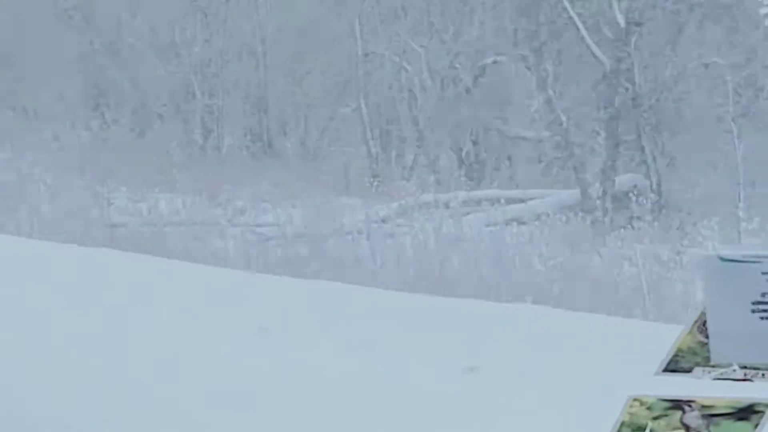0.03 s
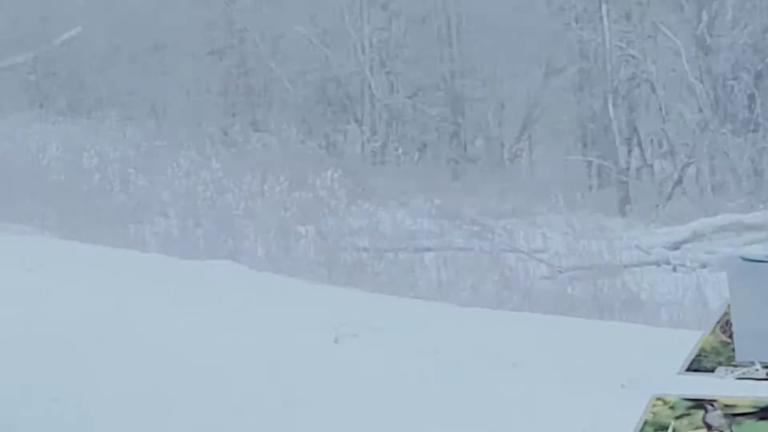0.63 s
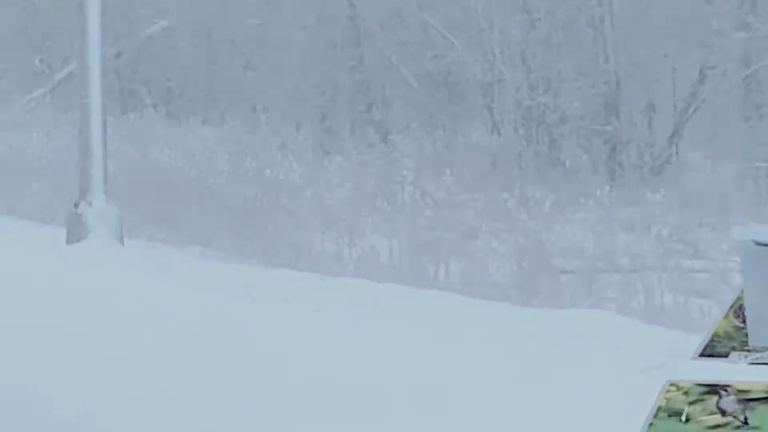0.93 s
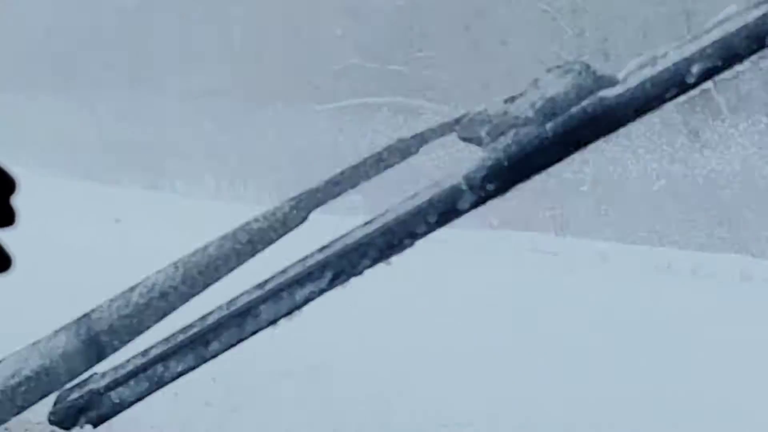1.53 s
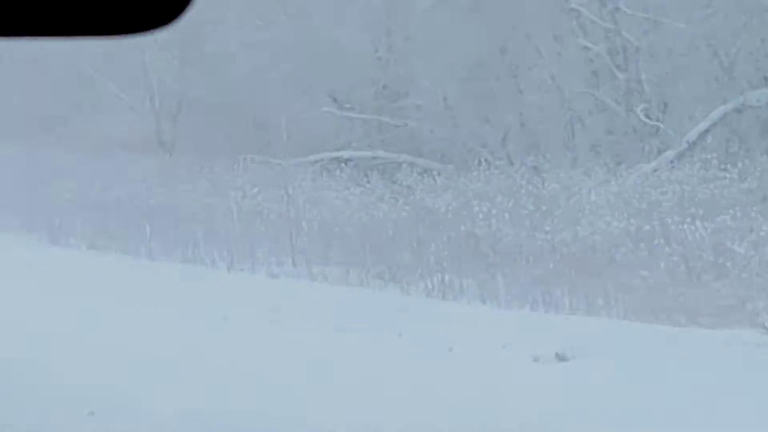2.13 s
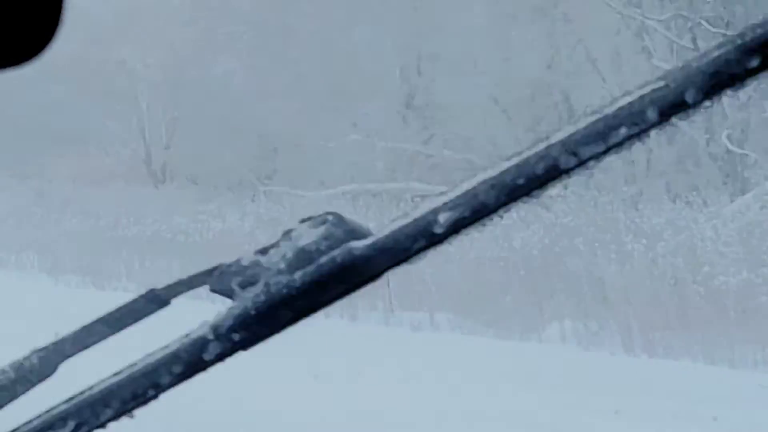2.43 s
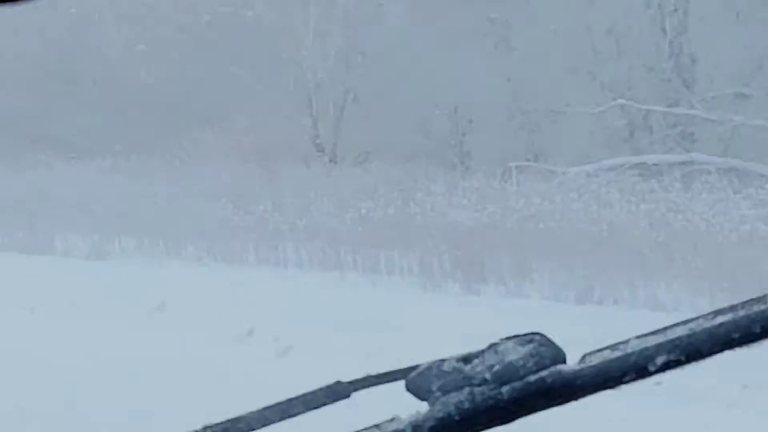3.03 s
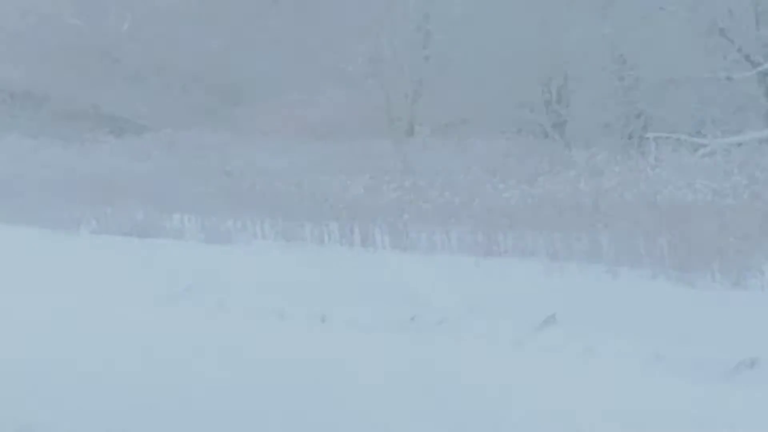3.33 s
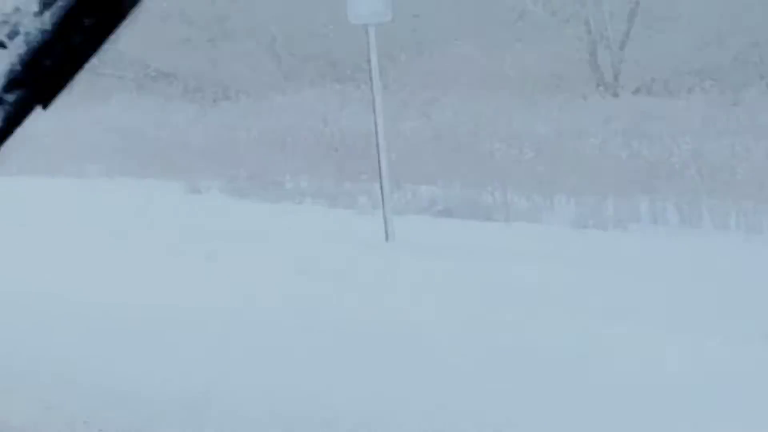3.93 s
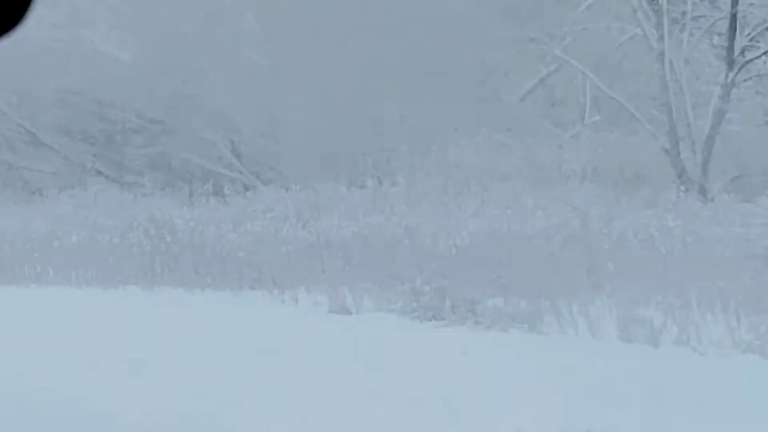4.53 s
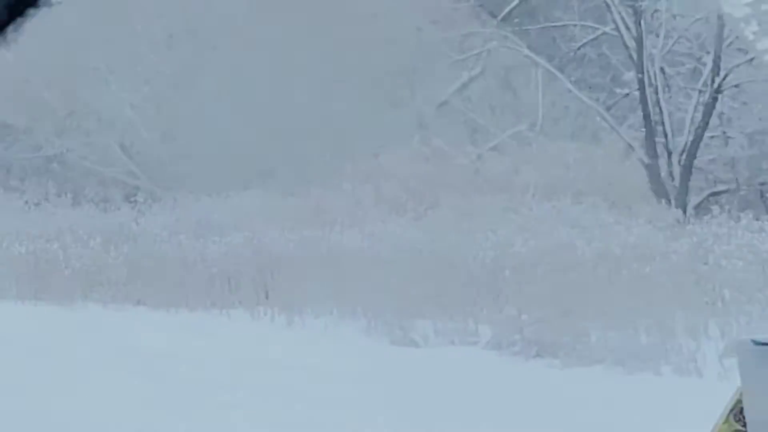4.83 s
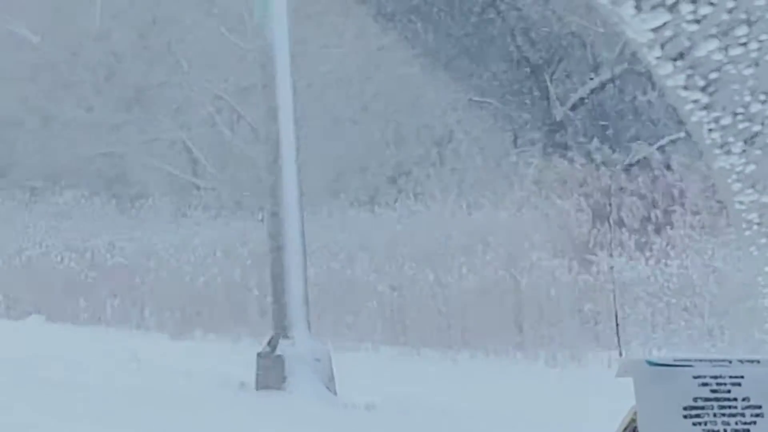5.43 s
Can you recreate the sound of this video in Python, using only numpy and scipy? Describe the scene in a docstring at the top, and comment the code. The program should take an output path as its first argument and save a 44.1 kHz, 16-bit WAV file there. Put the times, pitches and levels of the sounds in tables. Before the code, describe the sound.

Windshield wipers thump and flip at regular intervals above the low drone and bumps of a car driving through snow, heard inside.

```python
"""A car drives steadily on a snowy road, heard from inside: the tyres shake the body into a rumble,
a drone and a roar, and ruts make it boom. Slush hisses under the wheels and the wiper blades.
The wipers turn about every 0.8 s: at the near end the arm knocks and the rubber blade slaps over,
at the far end it flips softly with a clunk that once booms. The rubber scuffs, chatters, sweeps off
snow and squeals faintly once. Small ticks and light rustles come and go."""
import sys
import numpy as np
from scipy import signal
from scipy.fft import rfft, irfft
from scipy.io import wavfile
from scipy.ndimage import uniform_filter1d

SR = 44100
rng = np.random.default_rng(int(sys.argv[2]) if len(sys.argv) > 2 else 0)


def pcm_store(signal):
    """Save signal as 16-bit PCM."""
    levels = np.round(np.clip(np.atleast_2d(signal), -1, 1) * 32767)
    wavfile.write(sys.argv[1], SR, levels.astype(np.int16).T)


N = 242550
TIME = np.arange(N) / SR
FREQS = np.maximum(np.arange(N // 2 + 1) * SR / N, 1)

# A tone colour says how strong each pitch is. Levels in all tables are relative.
# Bright tone colour of spraying slush, also used for the ticks: pitch_hz, level_db
SPRAY_COLOUR = [(1500, 10), (3500, 8), (5500, 3), (7000, 2), (8000, -3), (9500, -1.5), (11000, -1),
                (15500, -4)]


def from_db(db):
    """Turn decibels into a number to multiply by."""
    return 10 ** (np.asarray(db) / 20)


def unit_power(x):
    """Scale a sound to an average power of 1."""
    return x / np.sqrt(np.mean(x ** 2) + 1e-20)


def curve_over_pitch(points):
    """Join (pitch, value) points with straight lines on a scale of octaves."""
    hz, value = np.transpose(points)
    return np.interp(np.log(FREQS), np.log(hz), value)


def bump(centre_s, half_s):
    """A smooth rise and fall of height 1."""
    return np.exp(-((TIME - centre_s) / half_s) ** 2)


def in_cabin(pair, colour):
    """Give two unrelated signals a tone colour; both ears share the bass, the treble is all around."""
    # How alike left and right are in the cabin: pitch_hz, likeness (1 = the same, 0 = unrelated)
    likeness = [(30, 0.93), (75, 0.95), (170, 0.95), (340, 0.82), (520, 0.53), (800, 0.35), (1050, -0.24),
                (1550, -0.16), (2200, -0.32), (2700, -0.012), (3500, -0.14), (5000, -0.026), (15000, -0.12)]
    alike = np.clip(curve_over_pitch(likeness), -.99, .99)
    mid, side = rfft(pair) * from_db(curve_over_pitch(colour))
    left_right = np.sqrt(1 + alike) * mid + np.sqrt(1 - alike) * side * [[1], [-1]]
    return unit_power(irfft(left_right, N))


def noise(colour):
    """Stereo noise in the cabin with the given tone colour."""
    return in_cabin(rng.standard_normal((2, N)), colour)


def steady(x, span_s):
    """Even out the slow swells of a noise."""
    power = uniform_filter1d(np.mean(x ** 2, axis=0), max(int(span_s * SR), 100))
    return x / np.sqrt(power + 1e-9)


def grains(per_s, spread_db):
    """Tiny impacts of uneven size at random times."""
    sizes = from_db(spread_db * np.minimum(rng.exponential(1, (2, N)), 5))
    hits = rng.random((2, N)) < per_s / SR
    return unit_power(hits * sizes * rng.standard_normal((2, N)))


def contacts(rows, colour, tail_db, tail_s, grit_db):
    """Each touch of two parts is a quick rush of tiny impacts that dies away into a faint tail."""
    rush = in_cabin(grains(per_s=7000, spread_db=grit_db), colour)
    treble = signal.sosfiltfilt(signal.butter(1, 4500, "high", fs=SR, output="sos"), rush)
    out = np.zeros((2, N))
    for peak_s, level_db, rise_s, decay_s, treble_db in rows:
        span = slice(int((peak_s - .05) * SR), int((peak_s + .3) * SR))
        before, after = np.minimum(TIME[span] - peak_s, 0), np.maximum(TIME[span] - peak_s, 0)
        fall = np.hypot(np.exp(-after / decay_s), from_db(tail_db) * np.exp(-after / tail_s))
        loudness = from_db(level_db) * np.exp(-(before / rise_s) ** 2) * fall
        out[:, span] += loudness * (rush[:, span] + (from_db(treble_db) - 1) * treble[:, span])
    return out


def road():
    """Tyres shake the body into a deep rumble, a drone and a dull roar that follow the road surface."""
    # Tone colours of the three sounds: pitch_hz, level_db
    rumble_colour = [(12, -27), (26, -23), (38, 9.5), (48, -11), (61, 6.5), (74, 5.5), (90, 2), (115, -6.5),
                     (140, -12.5), (220, -69.5)]
    drone_colour = [(70, -3), (115, -0.5), (150, -1), (185, 0.5), (215, 0.5), (242, -5.5), (275, -3.5),
                    (305, -4), (360, -17), (450, -20), (700, -73)]
    roar_colour = [(200, -8.5), (340, 6), (400, 4), (480, 3), (600, 1.5), (780, 1), (970, -8), (1300, -6),
                   (1480, -7.5), (1680, -8), (2050, -13), (3000, -22.5), (6000, -56)]
    # Ruts shake the body harder, soft snow calms it: centre_s, half_length_s, rumble_db, drone_db
    patches = [(1.276, 0.11, 1.5, 4), (1.85, 0.28, -2, -.5), (2.073, .06, 6, 0.5), (3.148, 0.25, 2.5, 1),
               (3.493, 0.049, -3.5, -1), (3.863, 0.14, 9.5, 2), (4.2, 0.085, -2.5, 0.5), (4.53, 0.16, 3, 1),
               (4.873, 0.13, 5, 1.5), (5.35, 0.082, 1.5, 2.5)]
    rough_from_s, fade_s, roar_rise_db_per_s = 0.98, 0.75, 0.53
    smooth = np.clip(.5 - (TIME - rough_from_s) / fade_s, 0, 1)  # 1 on smooth road, 0 on rough
    rumble_swing_db = sum(db * bump(centre_s, half_s) for centre_s, half_s, db, _ in patches)
    drone_swing_db = sum(db * bump(centre_s, half_s) for centre_s, half_s, _, db in patches)
    roar_swing_db = 0.23 * drone_swing_db + roar_rise_db_per_s * (TIME - TIME.mean())
    rumble = from_db(-19.5 - 5 * smooth + rumble_swing_db) * steady(noise(rumble_colour), span_s=0.128)
    drone = from_db(-24 - 3.5 * smooth + drone_swing_db) * steady(noise(drone_colour), span_s=0.068)
    roar = from_db(-32.5 - smooth + roar_swing_db) * noise(roar_colour)
    return rumble + drone + roar


def slush():
    """Wet snow hisses steadily under the tyres, and under the blades more loudly as they move faster."""
    # Tone colour of the swish: pitch_hz, level_db
    swish_colour = [(1200, -6), (2200, -12.5), (2750, 2.5), (3500, -1.5), (4400, -6.5), (5400, -11),
                    (7000, -14), (8200, -22), (15000, -44)]
    # Wiper sweeps through wet snow: start_s, swish_db, spray_db, change_db (of both, start to end)
    sweeps = [(-.25, -71, -64, -10), (0.531, -66, -53.5, -2), (1.32, -57, -42.5, -8),
              (2.06, -49.5, -52, -2), (2.91, -50.5, -50.5, -5), (3.66, -50, -54, -7),
              (4.45, -52.5, -54.5, -12.5), (5.3, -50.5, -59, -2)]
    sweep_s = 0.98
    swish_gain, spray_gain = from_db(-51), from_db(-66)  # the tyres' steady share
    for start_s, swish_db, spray_db, change_db in sweeps:
        progress = np.clip((TIME - start_s) / sweep_s, 0, 1)
        speed = np.abs(np.sin(np.pi * progress))
        loudness = speed ** 0.45 * from_db(change_db * (progress - .5))
        swish_gain = np.hypot(swish_gain, from_db(swish_db) * loudness)  # hypot adds the powers
        spray_gain = np.hypot(spray_gain, from_db(spray_db) * loudness)
    rub = rng.standard_normal((2, N)) + from_db(-5) * grains(per_s=500, spread_db=2)
    drops = rng.standard_normal((2, N)) + from_db(-5) * grains(per_s=500, spread_db=3.5)
    return swish_gain * in_cabin(rub, swish_colour) + spray_gain * in_cabin(drops, SPRAY_COLOUR)


def ticks_and_rustles():
    """Small sharp ticks and light rustles; the wiper blade also sweeps off snow and chatters."""
    # Sharp ticks, with a quick run of blade chatter near 2.3 s: peak_s, level_db
    tick_times = [(.116, -42), (.137, -42), (.234, -43), (2.262, -37), (2.309, -35), (2.362, -38),
                  (3.367, -36.5), (4.142, -35.5), (5.047, -38)]
    # Light rustles, the last is snow swept off by the blade: peak_s, level_db, rise_s, decay_s, treble_db
    rustle_rows = [(.847, -31, 0.0082, 0.023, -3.5), (1.262, -46.5, 0.0045, 0.0082, 8.5),
                   (1.353, -42, 0.0094, 0.0075, 5), (1.985, -49, 0.074, .03, 6)]
    # Tone colour of the rustles: pitch_hz, level_db
    rustle_colour = [(1200, -5), (2400, -1), (3300, 0), (5000, -2), (6300, 0), (7000, 3), (8000, -3),
                     (10000, -8.5), (15500, -7)]
    rise_s, decay_s, treble_db = .0003, .0015, 3
    tick_rows = [(peak_s, level_db, rise_s, decay_s, treble_db) for peak_s, level_db in tick_times]
    rustles = contacts(rustle_rows, rustle_colour, tail_db=-13, tail_s=0.055, grit_db=2.0)
    ticks = contacts(tick_rows, SPRAY_COLOUR, tail_db=-20, tail_s=.008, grit_db=2.0)
    return from_db(-1.0) * rustles + from_db(-1.5) * ticks


def thuds():
    """Ruts, and once the wiper's clunk, make the cabin boom with a short, low tone."""
    # Booms from ruts, and from the wiper's clunk at 4.518 s: start_s, level_db, pitch_hz, swell_s
    booms = [(1.297, -8, 90, 0.019), (2.036, -3, 80.2, 0.017), (3.786, -5, 70.5, 0.022),
             (3.892, -5.5, 50.8, 0.04), (4.518, -10, 196.4, 0.011), (4.785, -11.5, 172, 0.011),
             (4.926, -8.5, 83.3, 0.017), (5.085, -10.5, 82.8, 0.013)]
    out = np.zeros(N)
    for start_s, level_db, pitch_hz, swell_s in booms:
        age = np.maximum(TIME - start_s, 0)
        loudness = from_db(level_db) * age / swell_s * np.exp(1 - age / swell_s)
        out += loudness * np.sin(2 * np.pi * pitch_hz * age)
    return out


def wipers():
    """At each turn the arm knocks or clunks and the blade flips over; the rubber also scuffs the glass."""
    # Turns at the near end: peak_s, slap_db, slap_treble_db, knock_db, knock_treble_db, rebound_db
    near_turns = [(2.1115, -11.5, -11.5, -24.5, 8.5, -35.5), (3.721, -13.5, 7.5, -11, -2, -45),
                  (5.320, -7.5, 0.5, -17, 0, -28.5)]
    # Turns at the far end: peak_s, flip_db, flip_treble_db, clunk_db, clunk_treble_db
    far_turns = [(1.357, -38, -5, -41, 0), (2.904, -30.5, -4.5, -30.5, 11.5), (4.509, -44, -3, -18, -5)]
    # The rubber catches on the glass: peak_s, level_db, rise_s, decay_s, treble_db
    scuff_rows = [(1.385, -41, 0.016, 0.033, -15), (2.03, -41.5, 0.087, 0.12, -4),
                  (2.63, -42, 0.06, 0.13, -7), (3.81, -38, 0.0058, 0.013, -2), (3.905, -44, 0.013, 0.04, 3),
                  (4.735, -37.5, 0.0055, .011, -5)]
    # Tone colours of blade slap, arm knock, rubber scuff and hollow clunk: pitch_hz, level_db
    slap_colour = [(200, -2), (600, -1.5), (1100, -9), (2200, 1.5), (2920, 5.5), (3300, 1), (4100, -1),
                   (5200, -4.5), (6500, -10), (8000, -17.5), (12000, -20), (15500, -25.5)]
    knock_colour = [(150, -26), (350, 12.5), (480, 0), (660, 1.5), (850, -4.5), (1130, 4), (1450, -10.5),
                    (2000, -6.5), (2750, -0.5), (3400, -14), (5000, -17), (8000, -29.5), (15500, -37)]
    scuff_colour = [(800, 6), (1500, 7), (2200, -5), (2750, 5), (3100, -4), (3600, 1), (4400, -15),
                    (6500, -18), (8000, -18.5), (15500, -21)]
    clunk_colour = [(200, 3.5), (600, -1), (950, -2.5), (1250, 0), (1500, 4), (1680, -1), (1830, 5),
                    (2300, -10), (3200, -18), (3800, -11), (5000, -31), (8000, -29), (15500, -28)]
    knock_shape, slap_shape = (0.0086, 0.019), (0.0041, 0.0071)  # rise_s, decay_s
    flip_shape, clunk_shape = (0.012, 0.016), (0.0061, 0.012)  # rise_s, decay_s
    knock_lead_s = .02  # the arm reverses just before the blade flips
    rebound_s, rebound_treble_db = .036, -11  # the blade settles with a second, light slap
    slap_rows, knock_rows, clunk_rows = [], [], []
    for peak_s, slap_db, slap_treble_db, knock_db, knock_treble_db, rebound_db in near_turns:
        knock_rows.append((peak_s - knock_lead_s, knock_db, *knock_shape, knock_treble_db))
        slap_rows.append((peak_s, slap_db, *slap_shape, slap_treble_db))
        slap_rows.append((peak_s + rebound_s, rebound_db, *slap_shape, rebound_treble_db))
    for peak_s, flip_db, flip_treble_db, clunk_db, clunk_treble_db in far_turns:
        slap_rows.append((peak_s, flip_db, *flip_shape, flip_treble_db))
        clunk_rows.append((peak_s, clunk_db, *clunk_shape, clunk_treble_db))
    slaps = from_db(0.4) * contacts(slap_rows, slap_colour, tail_db=-27, tail_s=.03, grit_db=3.0)
    knocks = from_db(-1.5) * contacts(knock_rows, knock_colour, tail_db=-30, tail_s=.03, grit_db=0.45)
    scuffs = from_db(5.0) * contacts(scuff_rows, scuff_colour, tail_db=-24, tail_s=.03, grit_db=0.5)
    clunks = from_db(2.0) * contacts(clunk_rows, clunk_colour, tail_db=-28, tail_s=.03, grit_db=3.5)
    ring = from_db(-1.9) * arm_ring(slaps + knocks)
    return slaps + knocks + ring + scuffs + clunks


def arm_ring(hits):
    """The wiper arm and the glass ring on at their own pitches after a hit."""
    # Ringing tones of arm and glass: pitch_hz, width_hz (narrower rings longer), level_db
    tones = [(1040, 40, 5), (1205, 35, 6), (1490, 45, 0), (1990, 45, -5), (2285, 35, -2), (2490, 40, -7),
             (2690, 70, 0), (3010, 110, 0), (3350, 60, -1), (3830, 60, 0), (4030, 70, 0), (4290, 60, 2.5),
             (5000, 120, 0), (5560, 110, -3)]
    out = np.zeros((2, N))
    for pitch_hz, width_hz, level_db in tones:
        kept = np.exp(-np.pi * width_hz / SR)  # share of the ringing left after one sample
        feed_in = np.array([1, 0, -1]) * (1 - kept * kept) / 2
        feedback = [1, -2 * kept * np.cos(2 * np.pi * pitch_hz / SR), kept * kept]
        out += from_db(level_db) * signal.lfilter(feed_in, feedback, hits + 1e-18)
    return out


def squeal():
    """On the wettest sweep the rubber sticks and slips, making a faint, unsteady, rising tone."""
    peak_s, pitch_hz, rise_hz_per_s, width_hz = 1.63, 3950, 1300, 450
    phase = 2 * np.pi * np.cumsum(pitch_hz + rise_hz_per_s * (TIME - peak_s)) / SR
    low_pass = signal.butter(2, width_hz / 2, fs=SR, output="sos")
    waver = signal.sosfilt(low_pass, rng.standard_normal((2, 2, N)))
    tone = unit_power(waver[0] * np.cos(phase) + waver[1] * np.sin(phase))
    return from_db(-51) * bump(peak_s, half_s=.22) * tone


def cabin_echoes(x):
    """Hard surfaces close by add quick echoes that strengthen some pitches and weaken others."""
    # Echoes off windscreen, dashboard and roof: left_delay_s, right_delay_s, level_db
    echoes = [(.00092, 0.00116, -45), (.00207, .00171, -24), (.00335, .00372, -10), (.00528, .00473, -18.5),
              (.0074, 0.0053, -10.5)]
    delays_s, gains = np.array(echoes)[:, :2], from_db(np.array(echoes)[:, 2])
    out = x.copy()
    for left_right_s, gain in zip(delays_s, gains):
        for side, lag in enumerate((left_right_s * SR).astype(int)):
            out[side, lag:] += gain * x[side, :N - lag]
    return out / np.sqrt(1 + np.sum(gains ** 2))  # keeps the power about the same


def scene():
    """Everything as heard from the front seat."""
    body = road() + thuds()
    lean_left = from_db([[.4], [-.4]])
    close_sounds = slush() * lean_left + wipers() + ticks_and_rustles() + squeal()
    return body + cabin_echoes(close_sounds)


def record(dry):
    """Round off the tallest peaks and cut away the highest treble."""
    ceiling, cutoff_hz = .95, 15600
    rounded = dry / (1 + np.abs(dry / ceiling) ** 8) ** (1 / 8)
    steep_low_pass = signal.ellip(14, .1, 90, cutoff_hz, fs=SR, output="sos")
    return signal.sosfilt(steep_low_pass, rounded)


dry = scene()
out = record(dry)
pcm_store(out)
```